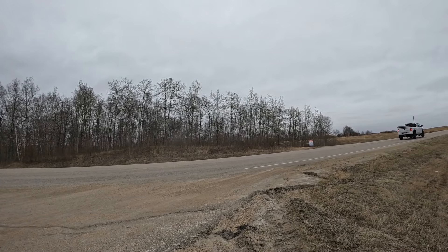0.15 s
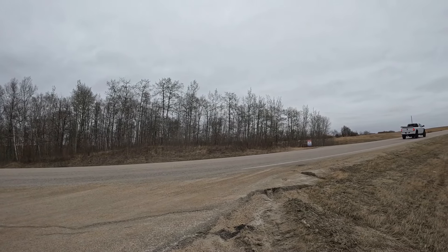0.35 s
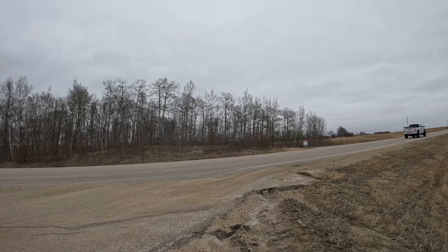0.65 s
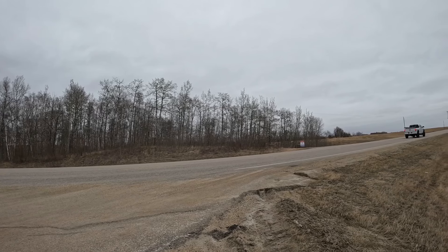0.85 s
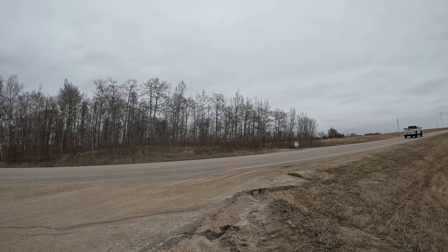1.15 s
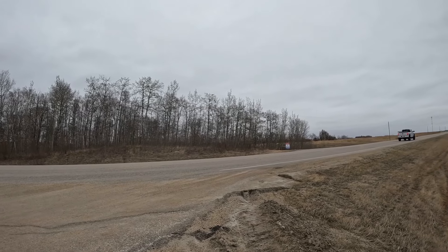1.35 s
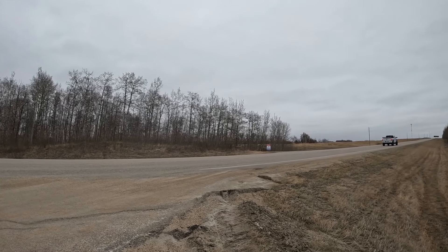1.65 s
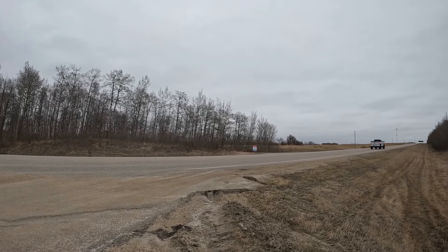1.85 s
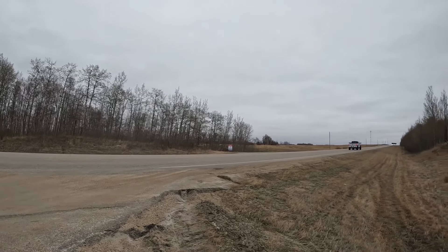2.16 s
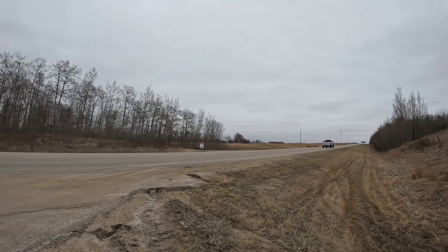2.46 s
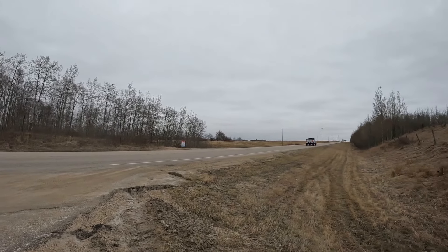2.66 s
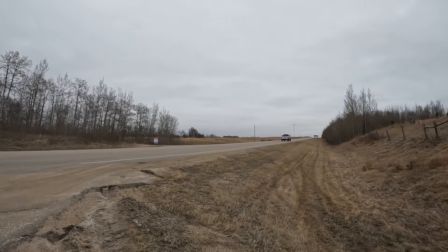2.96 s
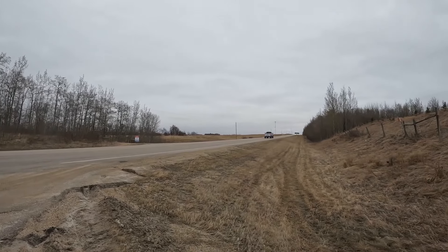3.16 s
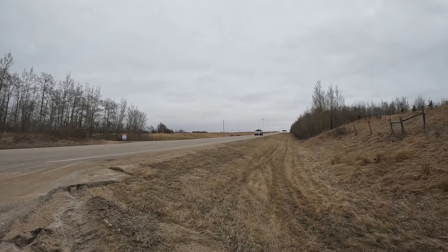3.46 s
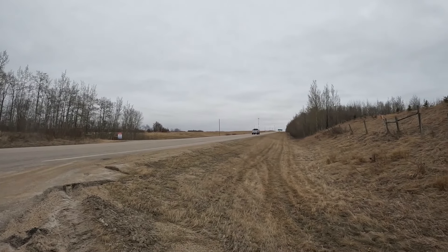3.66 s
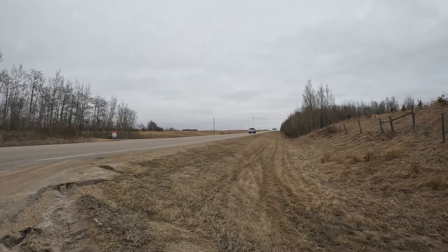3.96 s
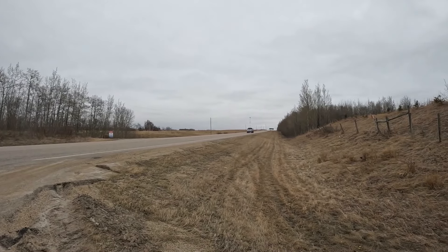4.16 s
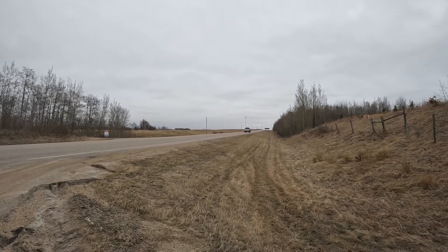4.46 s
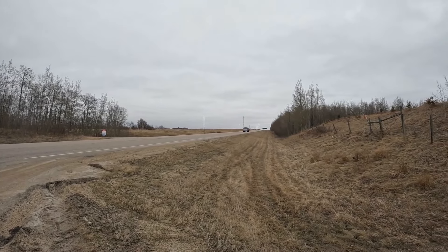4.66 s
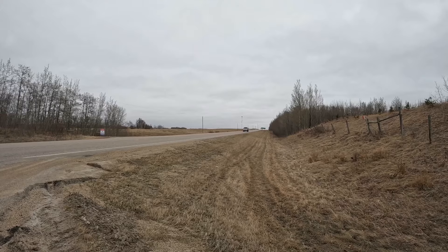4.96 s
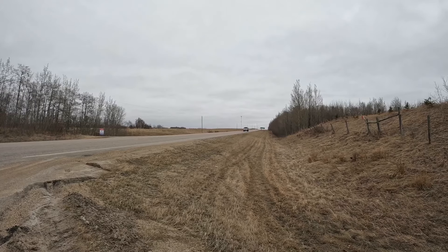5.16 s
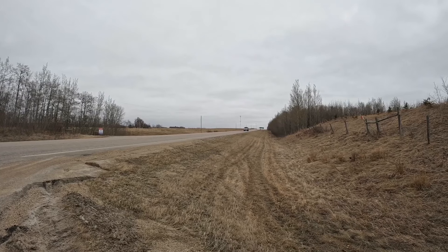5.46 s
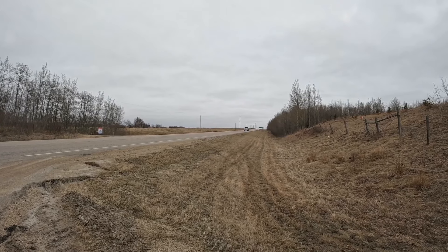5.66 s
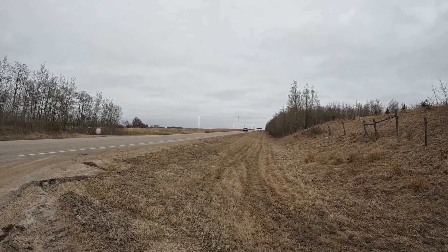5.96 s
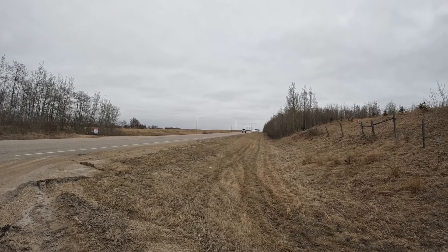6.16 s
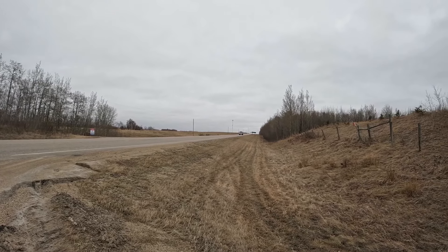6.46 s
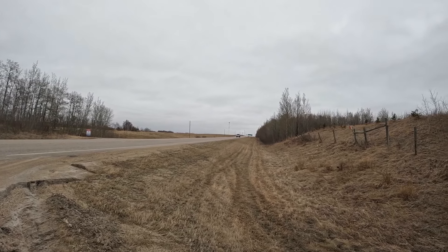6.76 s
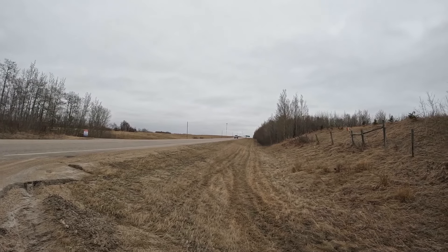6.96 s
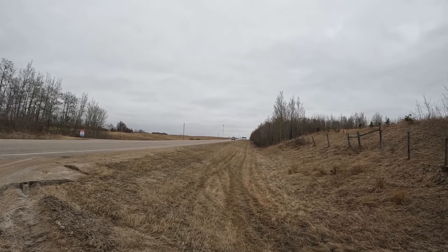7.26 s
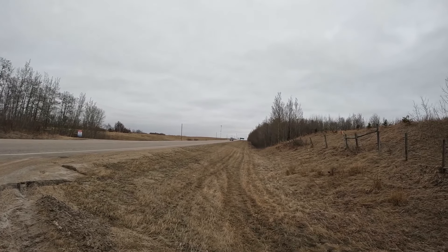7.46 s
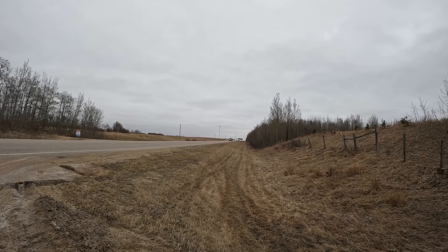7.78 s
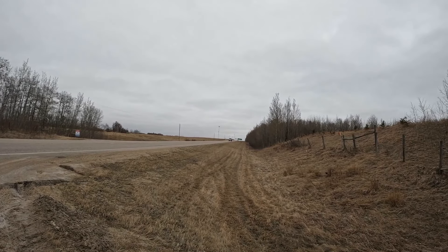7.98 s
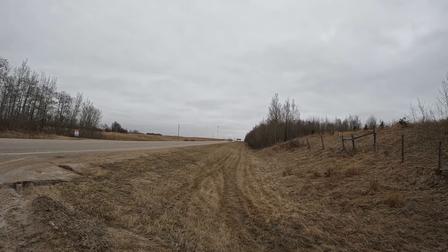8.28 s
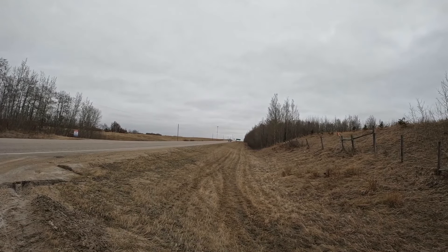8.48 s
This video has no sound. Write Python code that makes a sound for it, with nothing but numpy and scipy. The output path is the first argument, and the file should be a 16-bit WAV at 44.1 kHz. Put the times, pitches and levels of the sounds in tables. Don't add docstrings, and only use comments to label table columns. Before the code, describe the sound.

A rough diesel pickup with an open exhaust growls away along a country road, lifts off for a gear change, then pulls again, distant in gusting wind.

```python
import sys
import numpy as np
from scipy import signal
from scipy.io import wavfile
from scipy.ndimage import uniform_filter1d

SR = 44100
rng = np.random.default_rng(int(sys.argv[2]) if len(sys.argv) > 2 else 0)


def digitize_waveform(pressure):
    field = np.atleast_2d(pressure).T
    bounded = np.clip(field, -1, 1)
    quanta = np.round(bounded * 32767).astype(np.int16)
    wavfile.write(sys.argv[1], SR, quanta)


def to_linear_factor(level_db):
    exponent = np.asarray(level_db, float) / 20
    return 10 ** exponent


N = 380141
TIME = np.arange(N) / SR
THROTTLE_SHUT, THROTTLE_OPEN = 5.248, 6.28

# centre in seconds, length in seconds, centre in Hz, width in Hz, gain in dB.
FOCUS = [(.1, 1.7, 3400, 300, 7), (.02, .22, 3000, 260, 6.5), (0.33, 1.1, 241, 32, 8.5),
         (.95, .26, 1100, 150, 1), (1.0, 0.3, 440, 150, 6.5), (1.2, 1.8, 372, 33, 8),
         (.55, 0.49, 300, 14, 5.5), (0.64, 0.16, 335, 51, 4), (4.0, .5, 390, 45, 5.5),
         (1.4, 0.24, 295, 30, 3), (2.1, .5, 320, 44, 4.5), (2.1, .35, 990, 250, 4.5),
         (5.36, 0.16, 118, 25, 3), (5.65, .15, 90, 20, 5), (8.2, 0.23, 190, 40, 6.5),
         (4.58, 0.4, 1200, 700, 3.5), (5.85, .3, 3880, 200, 5.5), (1.1, 5.5, 303.8, 24, 9),
         (2, 1.1, 290, 34, 2.5), (2.6, 0.48, 2100, 120, 3.5), (3.05, 0.72, 3660, 240, 7),
         (2.6, .2, 3200, 260, 4), (2.9, .15, 3900, 300, 5.5), (3.25, 0.65, 58, 16, 13.5),
         (3.33, 0.36, 2710, 200, 4.5), (3.33, 0.54, 1754, 220, 8.5), (4.5, 1.1, 597, 180, 6),
         (4.88, 0.55, 1150, 600, 5.5), (5.65, 1, 3050, 600, 5.5), (6.4, .14, 3300, 500, 3.5),
         (5.37, .16, 5660, 1200, 9.5), (6.87, 0.12, 2044, 150, 10), (8.08, 0.5, 625, 90, 3.5),
         (5.07, 0.27, 1150, 400, 2.5), (8.2, 0.25, 1000, 240, 5), (8.33, 0.34, 1512, 330, 9.5),
         (8.45, .15, 1100, 250, 5.5), (8.55, 0.11, 3700, 900, 6.5)]
# as above, with a loss as negative dB.
DIPS = [(0.16, .5, 512, 90, -10), (1.9, .3, 370, 40, -5.5), (1.45, .4, 410, 50, -2),
        (1.55, .5, 350, 30, -5), (4.3, 0.4, 365, 40, -5), (4.75, .7, 275, 40, -5.5),
        (5.3, .5, 624, 120.2, -4.5), (6.5, 0.68, 498, 120.5, -5.5), (7.71, 0.98, 477, 119.8, -3.5),
        (1.897, .6, 410, 50.1, -6), (2.0, .4, 199.3, 40, -6), (2.956, .5, 386, 110, -4.5),
        (3.002, .6, 521, 90.3, -5), (4.505, .6, 255.5, 49.8, -4.5), (4.7, .5, 314.5, 39.8, -5),
        (5.295, .35, 196.7, 39.9, -4.5), (6.9, .25, 2297, 700, -4.5), (5.22, .2, 3600, 1400, -5.5),
        (5.6, 1.1, 2520, 300, -5.5), (7, .1, 98, 30, -5.5), (6.13, .12, 74, 30, -6.5),
        (6.45, .4, 320, 30, -5.5), (6.7, .4, 329.6, 80.4, -7), (7.251, .15, 150, 39.8, -4),
        (7.914, .6, 318.5, 119.5, -4.5), (2.6, .3, 6480, 2500, -6), (1.2, .4, 8550, 2496, -4)]


def evened(x):
    return x / np.sqrt(np.mean(abs(x) ** 2) + 1e-20)


def curves(rows, t=TIME):
    s, *columns = np.transpose(rows)
    return [np.interp(t, s, column) for column in columns]


def bell(s, length, t):
    return np.exp(-(2 * (t - s) / length) ** 2)


def bells_db(rows, t):
    return sum(db * bell(s, length, t) for s, length, db in rows) + 0 * t


def swells(rows, calm_db):
    t = TIME[::64]
    power = to_linear_factor((calm_db + 0 * TIME)[::64]) ** 2
    power = power + sum((to_linear_factor(db) * bell(s, length, t)) ** 2 for s, length, db in rows)
    return np.interp(TIME, t, 10 * np.log10(power))


def lifted(rings, hz):
    return sum(db / (1 + (2 * (hz - ring_hz) / width) ** 2) for ring_hz, width, db in rings) + 0 * hz


def focused(t, hz, below_hz):
    return sum(lifted([ring], hz) * bell(s, length, t)
               for s, length, *ring in FOCUS + DIPS if ring[0] < below_hz)


def drift(hz, count, t):
    f = np.geomspace(hz / 12, hz, num=16) * rng.uniform(.85, 1.15, (count, 16))
    start = rng.random((count, 16))
    few = TIME[::256]
    rows = []
    for rates, starts in zip(f[:, :, None], start[:, :, None]):
        waves = np.sin(2 * np.pi * (rates * few + starts)) / np.sqrt(rates)
        rows.append(np.interp(t, few, evened(waves.sum(0))))
    return rows


def noise(colour, patchy_db, rings=(), far=None, leaves=(0, 1), air_db=0., size=1024):
    hop = size // 4
    frames, hz = N // hop + 5, np.fft.rfftfreq(size, 1 / SR)
    a, b, patches = rng.standard_normal((frames, len(hz), 3)).T
    patches = uniform_filter1d(patches, size=3, axis=0)
    patches = evened(uniform_filter1d(patches, size=16, axis=1))
    t = np.arange(frames) * hop / SR

    def colour_db(rows):
        f, db = np.transpose(rows)
        return np.interp(np.log(hz + 1), np.log(f + 1), db, left=-120, right=-120)[:, None]

    away = np.interp(t, leaves, (0, 1))
    db = (1 - away) * (colour_db(colour) + lifted(rings, hz)[:, None]) + away * colour_db(far or colour)
    db -= air_db * t * (hz[:, None] / 6000) ** 2
    bands = np.transpose([lifted([ring], hz) for _, _, *ring in FOCUS + DIPS])
    db += bands @ [bell(s, length, t) for s, length, *_ in FOCUS + DIPS]
    gain = to_linear_factor(db)
    gain = gain / np.linalg.norm(gain, axis=0) * to_linear_factor(patchy_db * patches)
    return evened(signal.istft((a + 1j * b) * gain, nperseg=size, noverlap=size - hop)[1][:N])


def slaps(rows):
    out = np.zeros(N)
    for s, db, hz in rows:
        near = slice(round(SR * (s - 2 / hz)), round(SR * (s + 2 / hz)))
        u = (TIME[near] - s) * hz * np.pi
        out[near] += to_linear_factor(db) * (1 - 2 * u ** 2) * np.exp(-u ** 2)
    return out


def wind():
    # frequency in Hz, level in dB per Hz.
    wind_colour = [(8, -11.5), (20, -1), (45, -5), (70, -5), (130, -7), (220, -24.5), (400, -34.5),
                   (700, -56.5)]
    # centre in seconds, length in seconds, peak in dB.
    gusts = [(.1, 0.72, -32.5), (1.52, 0.4, -31), (1.92, .11, -22.5), (2.1, 0.11, -23), (2.33, 0.59, -29.5),
             (2.83, .1, -28), (2.95, 0.1, -29), (3.15, 0.37, -38.5), (3.88, .2, -38.5), (4.11, 0.12, -34.5),
             (4.26, 0.1, -41), (4.43, 0.1, -37), (4.72, .18, -37), (4.9, 0.22, -34), (5.3, 0.41, -32.5),
             (5.43, .1, -26.5), (5.55, 0.13, -26), (5.67, 0.19, -21.5), (5.79, 0.097, -22),
             (6.04, 0.53, -25.5), (6.46, 0.13, -25.5), (6.56, .06, -24.5), (6.71, 0.32, -25),
             (7.0, 0.35, -26.5), (7.22, 0.18, -28), (7.39, 0.093, -28), (7.53, 0.12, -27.5),
             (7.75, 0.27, -21.5), (8.12, 0.77, -19), (8.48, 0.4, -25)]
    # time in seconds, peak in dB, pitch in Hz.
    pops = [
        (2.049, -17, 40),
        (5.7654, -14.5, 130),
        (5.766, -24, 340),
        (5.954, -19, 44),
        (6.081, -28, 213.7),
        (7.749, -28, 60),
    ]
    level_db = swells(gusts, calm_db=-51.5) - 2.0
    return to_linear_factor(level_db) * noise(wind_colour, patchy_db=1.0, size=4096) + slaps(pops)


def tyres(cycles, firing_db, weak_db):
    # frequency in Hz, level in dB per Hz.
    tyre_colour = [(30, -25.5), (70, -6.5), (150, -4.5), (250, -4.5), (350, -9.5), (500, -24.5), (800, -33)]
    # centre in seconds, length in seconds, change in dB.
    roar_swells = [
        (.8, .5, -3.5),
        (2.4, .9, -3),
        (4.901, 1.1, 6.5),
        (7.5, 1.8, -4.5),
    ]
    chug = 1 + .6 * np.exp(-TIME / 3) * np.cos(2 * np.pi * 3 * cycles - 1)
    level_db = 0.34 * firing_db + 0.83 * weak_db - 8.0 + bells_db(roar_swells, TIME)
    return chug * to_linear_factor(level_db) * noise(tyre_colour, patchy_db=0.5, size=4096)


def hiss():
    # frequency in Hz, level in dB per Hz.
    near_colour = [(1500, -26), (2600, -1), (3500, -6), (4500, -4.5), (5500, -10), (7000, -16), (8500, -23),
                   (10000, -28.5), (13000, -36.5), (16000, -50.5)]
    far_colour = [(1500, -31), (2600, -0.5), (3500, -3), (4500, -10), (5500, -18), (7000, -22), (8500, -24),
                  (10000, -36.5), (13000, -43.5), (16000, -55)]
    # pitch in Hz, width in Hz, gain in dB.
    duct_rings = [(3400, 220, 4), (4670, 250, 5.5), (5600, 180, 5.5), (6660, 320, 3.5)]
    # centre in seconds, length in seconds, peak in dB.
    puffs = [(.03, .16, -54), (.24, 0.19, -56.5), (.41, 0.14, -60), (.74, .16, -61), (1.04, 0.25, -55.5),
             (1.25, 0.16, -58), (1.47, 0.11, -66), (1.6, 0.11, -53), (1.77, 0.14, -54.5), (2.01, 0.15, -52),
             (2.16, 0.15, -51), (2.33, 0.16, -55.5), (2.59, 0.25, -49.5), (2.8, 0.25, -58.5),
             (2.98, 0.081, -55.5), (3.28, 0.63, -50), (3.47, 0.15, -50.5), (3.95, 1.7, -59),
             (4.75, 0.62, -59.5), (5.37, 0.12, -66), (5.62, 0.24, -67), (5.87, 0.43, -63), (6.3, 0.14, -65),
             (6.91, 0.16, -62), (7.55, 0.94, -61.5), (8.12, 0.25, -55), (8.31, .14, -56), (8.6, 0.14, -52),
             (8.4, 0.54, -56)]
    air = noise(near_colour, far=far_colour, leaves=(2.2, 2.45), patchy_db=3.0, rings=duct_rings,
                air_db=1.33, size=512)
    calm_db = -63.5 - 1.3 * TIME
    return to_linear_factor(swells(puffs, calm_db) + 5.0) * air


def rasp(cycles):
    # time in seconds, low rasp in dB, upper rasp in dB relative to the low.
    gas_flow = [(0, -44.5, -0.5), (.53, -46.5, -3), (.96, -38.5, -8.5), (1.8, -45.5, -1.5), (2.2, -42, -2),
                (2.6, -36, 0.5), (2.88, -42.5, -2.5), (3.27, -41, 1.5), (3.84, -38.5, -4),
                (4.37, -37.5, -5), (4.8, -37.5, 0.5), (5.5, -45.5, -0.5), (6.78, -45, -6.5),
                (6.84, -41.5, -8.5), (7.75, -42, -4.5), (8.04, -35.5, -6), (8.16, -36.5, 0.5),
                (8.62, -42, 5.5)]
    # frequency in Hz, level in dB per Hz.
    low_near = [(240, -34), (400, -7.5), (459, -8.5), (527, -23.5), (611, -6), (681, -12.5), (898, -3),
                (1300, -20), (1690, -49), (2860, -120)]
    low_far = [(240, -31.5), (400, -5), (455, -11.5), (605, -3.5), (830, -9), (1120, -12.5), (1300, -15),
               (1690, -37), (2860, -120)]
    upper_colour = [(600, -28), (900, -5.5), (1150, 1.5), (1500, -2.5), (2100, -2.5), (2600, -10),
                    (3600, -17.5), (5000, -23.5), (7000, -33.5), (10000, -56), (15000, -71)]
    # centre in seconds, length in seconds, added share of chopping.
    crackles = [
        (1.1, .4, .17),
        (2.58, .7, .3),
        (8.3, .9, .12),
    ]
    # time in seconds, extra strength in dB.
    cracks = [(2.429, 3), (2.47, 1), (2.686, 0), (2.481, 4), (2.52, 3), (2.539, 4.5), (2.55, 2.5),
              (2.569, 2.5), (2.589, 5.5), (2.599, 2), (2.627, 4), (2.657, 4), (2.704, 4), (2.732, 2)]
    # time in seconds, peak in dB, pitch in Hz.
    snaps = [
        (1.0305, -31, 1100),
        (1.0808, -25, 1000),
        (2.5897, -19, 1800),
        (2.6285, -26, 1500),
        (2.6585, -26, 1700),
    ]
    low_db, upper_db = curves(gas_flow)
    share = .33 - .025 * TIME + bells_db([(s, length, more) for s, length, more in crackles], TIME)
    firings = 6 * cycles + .3
    extra_db = 1.3 * rng.standard_normal(N // 20)
    for s, db in cracks:
        extra_db[round(np.interp(s, TIME, firings))] = db
    strength = to_linear_factor(extra_db)[firings.astype(int)]
    chop = evened(strength * np.exp(-(firings % 1) / .16))
    gate = uniform_filter1d(1 - share + share * chop, size=20)
    low = noise(low_near, far=low_far, leaves=(.8, 2.6), patchy_db=1.0) * (1 + 0.2 * (gate - 1))
    high = noise(upper_colour, patchy_db=1.8, air_db=1.0, size=512)
    crackle_filter = signal.butter(4, 4300, fs=SR, output="sos")
    body = signal.sosfiltfilt(crackle_filter, high)
    high = body * gate + (high - body) * (1 + .25 * (gate - 1))
    return to_linear_factor(low_db - 0.47) * low + to_linear_factor(low_db + upper_db - 0.96) * high + slaps(snaps)


def exhaust(cycles, hz, firing_db, beat_db, second_db, weak_db):
    # order numbers, then the strength of each in dB.
    orders = [3, 4, 5, 7, 8, 10, 11, *range(13, 34), 36, 37, 39]
    orders_db = [-19.5, -22, -16, -20.5, -5, -5.5, -11.5, -11.5, -18.5, -8, -17, -21, -11, -18.5, -24.5,
                 -13, -24, -16.5, -16.5, -33, -30, -19, -32.5, -25, -25.5, -33.5, -37, -23, -24.5, -31,
                 -33.5]
    order_swells = {7: [(1.75, .5, 4.5), (7.75, .5, 7)], 8: [(1.6, 2.2, -5), (7.8, .5, 8)],
                    10: [(.9, 1.1, 4), (2.75, .5, 4), (4.5, 1.1, -11)], 11: [(.2, .5, 7), (3.25, .5, 7),
                    (7.3, 1.3, 7.5)], 13: [(1.25, .5, 2.5), (2.3, .6, 5.5), (3.75, 0.55, -3),
                    (5.2, .5, -7)], 14: [(1.95, .9, 7)], 16: [(1.25, 0.55, 6), (4.25, .5, -4)],
                    17: [(.2, .5, 8), (1.9, .9, 6), (6.3, .4, 12)], 18: [(1.25, .5, -9), (3.75, .5, 3),
                    (6.7, 1.3, -4.5)], 19: [(1.0, 1.0, 8.5)], 20: [(.75, .5, -5), (1.8, 0.64, 7.5)],
                    22: [(1.75, .5, 5.5)], 21: [(1.58, .45, 2.5)], 25: [(.75, .5, 5.5), (1.75, .5, 3.5),
                    (3.0, 1.2, 5)], 26: [(2.0, .9, 6.5), (3.2, .5, 4.5)], 27: [(2.4, .8, 5)],
                    28: [(1.75, .5, 10)], 32: [(3.25, .5, 8.5)], 5: [(5.42, 0.18, 4.5)],
                    23: [(1.35, .3, -4.5)], 24: [(1.35, .3, -5)], 33: [(1.8, 1.1, -8)],
                    36: [(1.75, .6, -6.5)]}
    clear_tones = {17: [(6.42, .35, -50)], 18: [(8.25, .5, -52)], 23: [(7.15, 1.3, -53)],
                   24: [(3.4, .8, -53), (6.75, .5, -52)], 27: [(4.1, 1.3, -52)], 30: [(3.4, 1.1, -52),
                   (7.0, .9, -58)], 33: [(1.0, .45, -50), (3.9, 1.0, -57)], 36: [(2.47, .5, -50),
                   (3.4, 1.0, -55), (6.82, .5, -54), (8.05, .6, -46)], 37: [(8.2, .5, -50)],
                   39: [(2.6, .5, -52), (7.2, .5, -57), (8.12, .5, -46)]}
    t = TIME[::8]
    few = t[::32]
    turn = 2 * np.pi * cycles
    waver = drift(14, count=6, t=t)
    overrun = uniform_filter1d(1. * (t > THROTTLE_SHUT) * (t < THROTTLE_OPEN), size=40)
    since = np.maximum(t - THROTTLE_SHUT, 0)
    bite = bell(.5, .7, t)
    firing_db = firing_db - 14 * overrun * np.exp(-since / .12)
    out = to_linear_factor(firing_db + .8 * waver[0]) * np.cos(6 * turn + .08 * waver[1])
    out += to_linear_factor(beat_db + 1.5 * waver[2]) * np.cos(9 * turn - 1 - .55 * bite + .2 * waver[3])
    out += to_linear_factor(second_db + 1.5 * waver[4]) * np.cos(12 * turn - 2 - 1.1 * bite + .2 * waver[5])

    fades, slips = drift(5, count=len(orders), t=t), drift(6.6, count=len(orders), t=t)
    pull = bell(3.9, 2.2, t)
    weak, power = np.zeros(len(t)), np.zeros(len(t))
    for k, db, fade, slip in zip(orders, orders_db, fades, slips):
        grounded_db = -1.1 * (k * hz / 1800) ** 2 * np.minimum(t, 5.5)
        grounded_db += 4.6 * (k == 15) * (t > THROTTLE_OPEN)
        grounded_db += 9 * (k > 24 and k % 3 == 0) * pull
        echo_db = np.interp(t, few, focused(few, k * hz[::32] / 6, below_hz=800))
        gain = to_linear_factor(db + grounded_db + echo_db)
        power += gain ** 2 * (k > 7)
        if k % 3:
            start = k * k
        else:
            start = -2.6 if k % 6 else -1.2
        limp_db = {3: 14, 5: 21, 8: 5}.get(k, 0) * overrun * np.exp(-since / 6.1)
        limp_db = limp_db + np.interp(t, few, bells_db(order_swells.get(k, []), few))
        tone = to_linear_factor(2.6 * fade) * np.cos(k * turn + start + .024 * k * (1 - .5 * pull) * slip)
        weak += gain * to_linear_factor(limp_db) * tone
        for s, length, peak_db in clear_tones.get(k, []):
            out += to_linear_factor(peak_db) * bell(s, length, t) * tone
    tones = np.sqrt(2) * (out + to_linear_factor(weak_db - 3.0) * weak / np.sqrt(power))
    return signal.resample_poly(tones, up=8, down=1, padtype="line", window=("kaiser", 10))[:N]


def scene():
    # time in seconds, firing rate in Hz.
    speed = [(0, 92.2), (.22, 86.2), (.4, 77.07), (.95, 80.3), (1.15, 80.87), (1.87, 89.3), (2.5, 100.5),
             (3.3, 118.8), (3.85, 129.8), (4.4, 140.2), (4.72, 146), (4.9, 141.5), (5.22, 148.7),
             (5.5, 129.2), (6.33, 91.9), (6.52, 94.6), (7.3, 95.8), (8.62, 104.8)]
    # time in seconds, firing tone in dB, weaker orders in dB.
    load = [(0, -32, -31.5), (.33, -29.5, -33.5), (.44, -24, -27.5), (.95, -19.5, -21.5), (1.52, -27, -24),
            (2.1, -22, -25), (2.88, -19, -27.5), (3.9, -12, -29.5), (4.55, -17, -30), (5.08, -27.5, -37.5),
            (5.5, -39, -41.5), (6.18, -38.5, -45), (6.6, -22.5, -35.5), (6.9, -21.5, -32.5),
            (7.26, -25.5, -38.5), (7.9, -18.5, -44.5), (8.3, -20.5, -33), (8.62, -18.5, -43)]
    # centre in seconds, length in seconds, peak in dB.
    firing_swells = [
        (1.18, .3, -24),
        (1.87, .15, -29),
        (2.5, 0.63, -15.5),
        (3.3, 0.46, -24.5),
        (5.26, 0.31, -28.5),
        (5.76, 0.31, -24),
        (6.05, 0.1, -43),
        (6.83, 0.22, -19.5),
    ]
    beat_swells = [(.44, 0.19, -21), (.66, 0.22, -22), (.93, 0.26, -25.5), (1.36, 0.37, -32),
                   (1.76, 0.16, -26), (2.07, 0.38, -21.5), (2.93, 0.76, -24.5), (3.52, 0.24, -28),
                   (3.74, .15, -30.5), (4.1, 0.55, -35), (4.55, 0.63, -29), (5.4, 0.22, -38.5),
                   (5.62, 0.21, -27), (6.05, 0.5, -32.5), (6.71, 0.2, -35), (6.38, 0.28, -35.5),
                   (7.05, 0.25, -30.5), (7.26, 0.16, -33.5), (7.75, 0.52, -41.5), (8.03, 0.14, -36),
                   (8.22, 0.22, -33.5), (8.58, .13, -30)]
    second_swells = [(.77, 0.18, -29), (1.77, 0.39, -21.5), (2.63, 0.51, -23), (3.5, 0.88, -32),
                     (4.1, 0.58, -33), (6.36, 0.18, -39), (6.6, 0.2, -35), (6.87, .26, -29),
                     (7.75, 0.41, -43), (7.99, 0.33, -36), (8.4, 0.46, -42)]
    (hz,), (firing_db, weak_db) = curves(speed), curves(load)
    firing_db = swells(firing_swells, firing_db)
    beat_db = swells(beat_swells, weak_db - 6.5)
    hidden_db = -11 * np.clip((TIME - THROTTLE_SHUT) / .12, 0, 1)
    ground_loss_db = np.clip(2 * (2 * hz - 269.9), 0, 10.5)
    second_db = swells(second_swells, weak_db - 4.5 + hidden_db) - ground_loss_db
    cycles = np.cumsum(hz) / SR / 6
    known_firing = 2.5888
    cycles += (-6 * np.interp(known_firing, TIME, cycles) - .3) % 1 / 6
    tones = exhaust(*(c[::8] for c in (cycles, hz, firing_db, beat_db, second_db, weak_db)))
    return (wind() + tyres(cycles, firing_db, weak_db) + hiss() + rasp(cycles) + tones)[None]


def roll_off(x):
    return signal.sosfilt(signal.butter(12, 15600, fs=SR, output="sos"), x)


def record(dry):
    ceiling = .46
    held = dry / (1 + (dry / ceiling) ** 6) ** (1 / 6)
    held = held * np.sin(np.pi / 2 * np.minimum(TIME / .002, 1))
    return roll_off(held + to_linear_factor(-99) * rng.standard_normal(dry.shape))


dry = scene()
out = record(dry)
digitize_waveform(out)
```